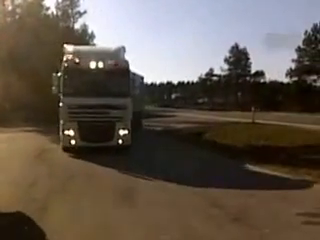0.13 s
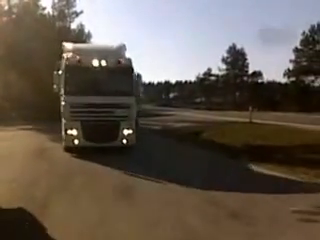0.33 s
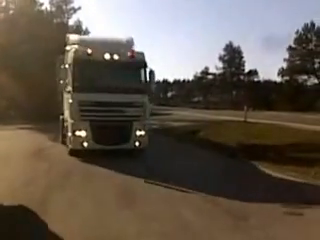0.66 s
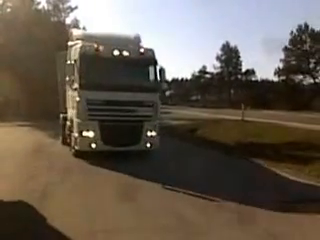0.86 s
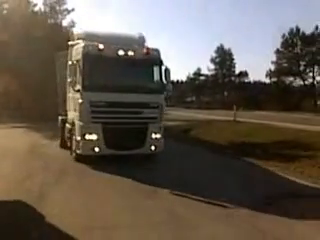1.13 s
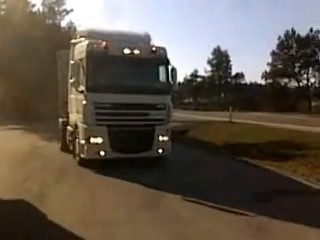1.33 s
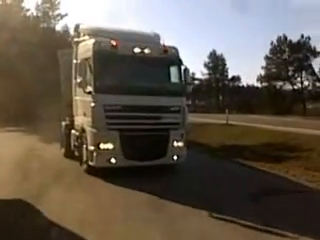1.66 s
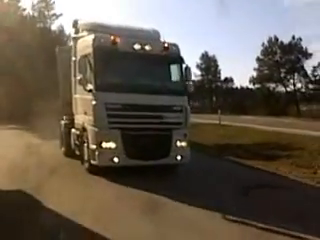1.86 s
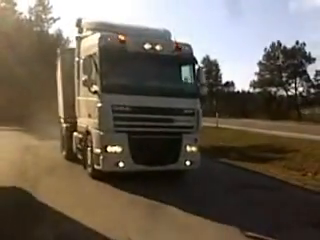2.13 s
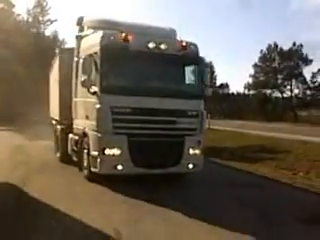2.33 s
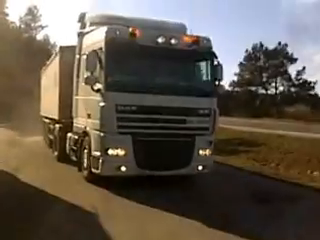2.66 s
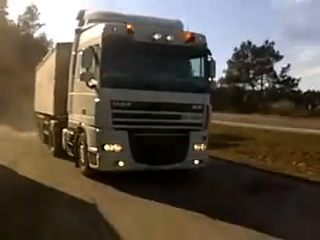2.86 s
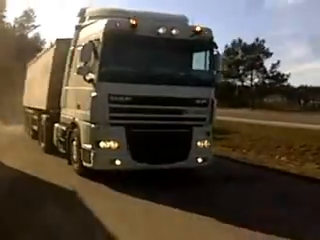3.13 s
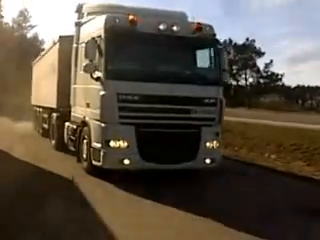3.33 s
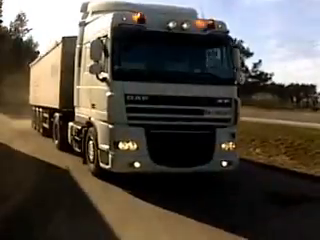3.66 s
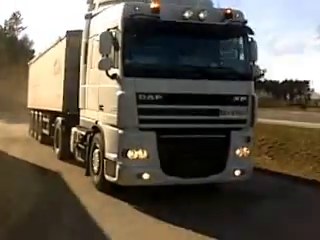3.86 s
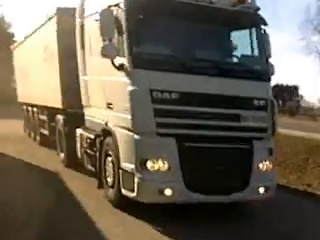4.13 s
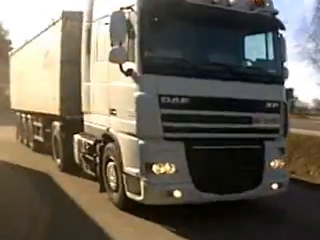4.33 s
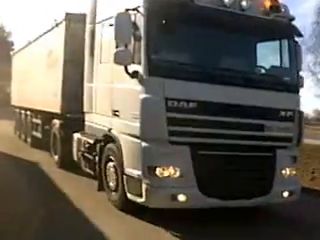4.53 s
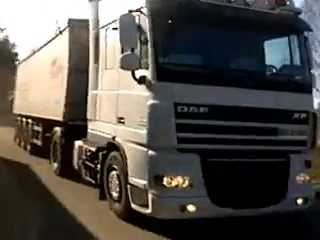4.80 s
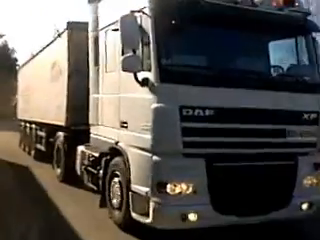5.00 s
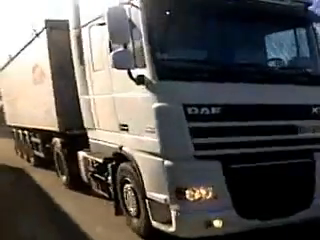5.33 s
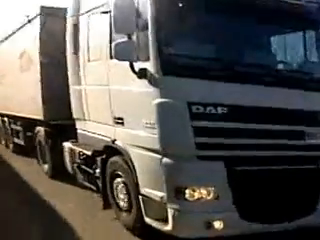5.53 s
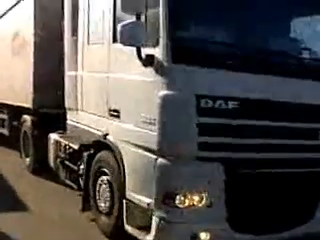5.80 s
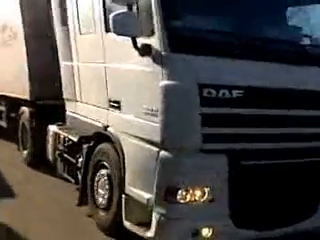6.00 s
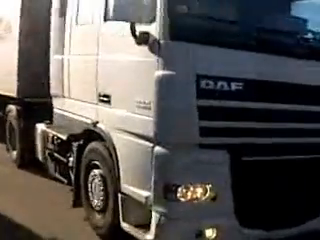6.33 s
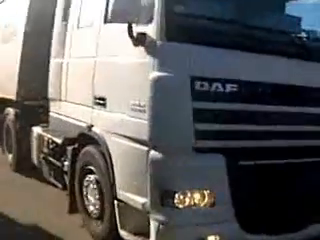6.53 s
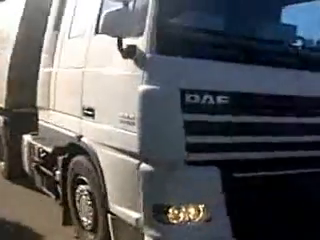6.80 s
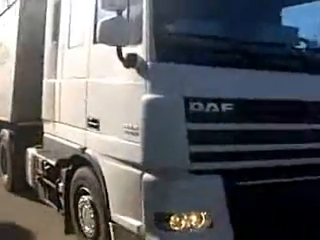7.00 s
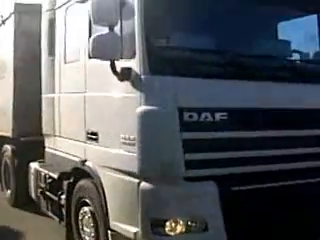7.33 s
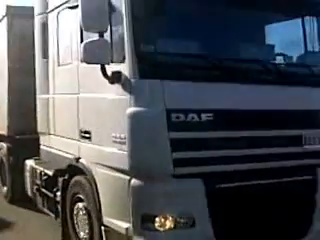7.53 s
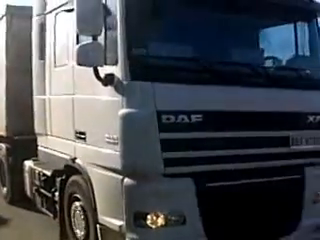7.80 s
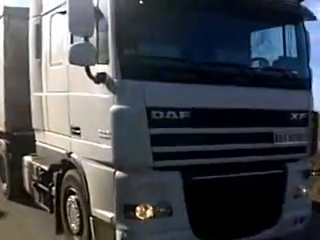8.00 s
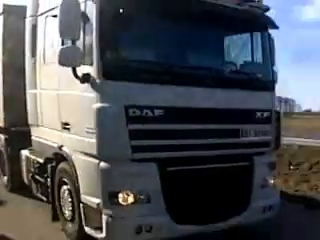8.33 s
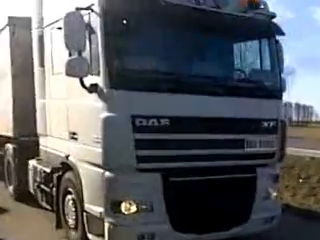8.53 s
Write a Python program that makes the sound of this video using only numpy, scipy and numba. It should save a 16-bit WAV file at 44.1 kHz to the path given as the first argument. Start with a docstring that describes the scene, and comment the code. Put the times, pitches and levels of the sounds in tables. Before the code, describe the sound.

A heavy truck draws near the microphone in blustery wind. Rough low buffeting and sharp pops cover its throbbing engine, with a distant burst of brake air. The horn gives two stabs, then one long, loud, slightly wavering mid-pitched blare that stops abruptly with a short echo. A close, bright air release follows, then small valve puffs, sliding whistles, clearer diesel clatter and a faint gear whine.

```python
"""A truck horn gives two short taps and one long blast: a driven plate makes a stack of tones, coloured by echoes.
Air brakes vent as shaped jets of hiss, and a valve whistles as hiss through narrow, sliding filters.
The diesel is noise throbbing at a steady firing rate, heard lower during the horn, with two gear hums.
Gusts of wind buffet the microphone: low thumps, a higher flutter and sharp pops, all made from noise and pulses."""
import sys
import numpy as np
from scipy import signal
from scipy.fft import rfft, irfft, next_fast_len
from scipy.io import wavfile
from scipy.ndimage import uniform_filter1d
from numba import njit

SR = 44100
rng = np.random.default_rng(int(sys.argv[2]) if len(sys.argv) > 2 else 0)


def transcribe(signal):
    """Save signal, clipped to [-1, 1], as a 16-bit WAV file at the path in sys.argv[1]."""
    frames = np.atleast_2d(signal).T
    limited = np.clip(frames, -1, 1)
    pcm = np.round(limited * 32767).astype(np.int16)
    wavfile.write(sys.argv[1], SR, pcm)


N = 381637  # length in samples


def undb(db):
    """Turn decibels into a gain."""
    return 10 ** (np.asarray(db) / 20)


def unit(x):
    """Scale a sound to an rms level of 1."""
    return x / np.sqrt(np.mean(x ** 2))


def curves(rows):
    """Join the points of a table by straight lines; the first column is time in seconds."""
    s, *columns = np.transpose(rows)
    return [np.interp(np.arange(N) / SR, s, c) for c in columns]


def walk(rate):
    """Wander at random: new levels `rate` times a second, smoothed twice, with a spread near 1."""
    hold = int(SR / rate)
    steps = np.repeat(rng.standard_normal(N // hold + 1), hold)
    smooth = uniform_filter1d(uniform_filter1d(steps, hold), hold)
    return 1.75 * smooth[:N]


def colour(x, points):
    """Filter x by a curve of (pitch_hz, relative_db) points, then scale it to rms 1."""
    size = next_fast_len(N)
    hz, db = np.transpose(points)
    log_hz = np.log(np.arange(size // 2 + 1) * SR / size + 1e-3)
    gain = undb(np.interp(log_hz, np.log(hz), db))
    return unit(irfft(rfft(x, size) * gain, size)[:N])


@njit
def svf(x, hz, width):
    """Let through a band of sound around a centre pitch that can move (state-variable filter)."""
    y, band, low = np.empty(len(x)), 0., 0.
    for i in range(len(x)):
        g, k = np.tan(np.pi * hz[i] / SR), width / hz[i]
        v = (band + g * (x[i] - low)) / (1 + g * (g + k))
        band, low, y[i] = 2 * v - band, low + 2 * g * v, k * v
    return y


# changing breeze under the gusts, with lulls: start_s, thump_db
BREEZE = [(0, -31), (.6, -36), (1.0, -24), (1.59, -42), (2.0, -26), (2.6, -45), (3.0, -30), (3.85, -37.5),
          (4.2, -38.5), (4.6, -31.5), (5.2, -33.5), (5.8, -42.5), (6.3, -30.5), (7.0, -42), (7.5, -36.5),
          (8.3, -32), (8.58, -30), (8.65, -56)]
BREEZE_FLUTTER_DB = -5.5  # flutter against thump
# gusts on the microphone: start_s, length_s, thump_db, flutter_above_thump_db
GUSTS = [(0.12, 0.031, -24, -25), (0.367, 0.068, -32, -9), (0.654, 0.027, -33, -1), (0.766, 0.11, -23.5, 4),
         (.86, 0.11, -19, -7), (1.026, 0.03, -19.5, -1), (1.143, 0.042, -15, 3.5),
         (1.196, 0.049, -14.5, -1.5), (1.37, 0.049, -20.5, -5.5), (1.695, 0.038, -21.5, -9.5),
         (1.824, 0.03, -12.5, -3), (1.991, 0.091, -12.5, -1), (2.137, 0.088, -16, 0),
         (2.346, 0.026, -24.5, -1), (2.709, 0.12, -20, 5), (2.85, 0.17, -24, 4), (3.055, 0.052, -16.5, 0.5),
         (3.272, 0.22, -27.5, 5.5), (3.44, .17, -22.5, -1), (4.374, 0.06, -26, -5.5),
         (5.616, 0.026, -25, 1.5), (5.907, 0.036, -30.5, -7), (5.99, 0.087, -23, -7),
         (6.414, 0.13, -24, -6), (6.627, 0.16, -26, -7.5), (6.848, 0.025, -29, -5.5),
         (7.083, 0.26, -26, -4.5), (7.32, 0.025, -29, -1), (7.593, 0.023, -27, 0), (7.771, 0.014, -25, -4),
         (7.9, 0.063, -23.5, -2), (7.989, 0.067, -21.5, 1.5), (8.13, 0.37, -25, -15),
         (8.508, 0.053, -20, -17.5)]
GUST_RISE_DB_S, GUST_SAG_DB_S = 510, 10
GUST_FALL_DB_S = 231  # on top of the sag


def gusts():
    """Levels of thump and flutter: every gust rises, sags and falls alike, adding its power to the breeze."""
    t = np.arange(N) / SR
    thump_power = undb(2 * curves(BREEZE)[0])
    flutter_power = thump_power * undb(2 * BREEZE_FLUTTER_DB)
    for s, length, db, flutter_db in GUSTS:
        off_db = GUST_RISE_DB_S * np.clip(s - t, 0, 1)
        off_db += GUST_SAG_DB_S * np.clip(t - s, 0, 1)
        off_db += GUST_FALL_DB_S * np.clip(t - s - length, 0, 1)
        thump_power = thump_power + undb(2 * (db - off_db))
        flutter_power = flutter_power + undb(2 * (db + flutter_db - off_db))
    return np.sqrt(thump_power), np.sqrt(flutter_power)


# loudest wind pops: start_s, strength_db
LOUD_POPS = [(0.83, -16), (1.036, -9), (1.084, -14), (1.136, -6), (1.155, -5), (1.17, -4), (1.707, -14.5),
             (2.684, -9), (2.719, -7), (2.75, -16), (2.804, -6), (3.061, -6), (3.098, -8)]
POP_GROWTH, POP_DB = 2.08, 6  # power of the flutter level that small pops follow, and their gain


def wind():
    """Uneven eddies hit the microphone port as thump and flutter; strong gusts also snap sharp pops across it."""
    thump_level, flutter_level = gusts()
    eddies = rng.standard_normal(N) * undb(3.82 * walk(60))
    slow = rng.standard_normal(N) * undb(0.54 * walk(40))
    thump = colour(eddies + slow, [(12, -2), (28, -5.5), (60, 1), (105, -5.5), (170, -26.5), (400, -95)])
    flutter = colour(eddies, [(60, -31.0), (115, 1.0), (200, -2), (320, -10.0), (480, -20.5), (900, -60)])
    # about 90 random kicks a second, of very uneven strength
    kicks = (rng.random(N) < 90 / SR) * rng.choice([-1., 1.], N) * undb(3.5 * rng.standard_normal(N))
    pops = colour(kicks, [(60, -20), (200, -2.5), (450, -1), (750, -11.5), (1200, -19.5), (2500, -48)])
    # pops grow faster than the gust that drives them
    pop_level = undb(POP_DB) * flutter_level ** POP_GROWTH
    # one loud pop: a sharp spike with a slower swing the other way
    lag = np.arange(-200, 600) / SR
    slap = np.exp(-(lag / 0.00049) ** 2) - 0.32 * np.exp(-((lag - .004) / 0.011) ** 2)
    loud = np.zeros(N)
    for s, db in LOUD_POPS:
        loud[int((s + .002) * SR)] = undb(db)
    loud = np.convolve(loud, slap)[200:N + 200]
    rush = thump_level * thump + flutter_level * flutter + pop_level * pops
    # the capsule saturates under the hardest buffets
    return loud + .6 * np.tanh(rush / .6)


FIRING_HZ = 27.83
# diesel as heard, lower while the horn sounds: start_s, clatter_db, throb_depth (0-1)
ENGINE = [(0.0, -32.5, 0.13), (1.08, -29, 0.01), (1.47, -37.5, 0.13), (1.83, -34.5, 0), (2.04, -35, 0.66),
          (2.4, -41, 0.66), (3.0, -38.5, 0.76), (3.5, -41.5, 0.71), (4.6, -42, 0.74), (4.96, -42.5, 0.1),
          (5.64, -35, 0.31), (6.99, -30.5, 0.26), (8.65, -36, 0.41)]
# tone colour of the clatter: pitch_hz, relative_db (per Hz)
CLATTER = [(260, -5), (450, -0.5), (676, -0.5), (782, 0), (944, 2), (1640, 2.5), (2040, -1.5), (2320, -9),
           (3250, -19.5), (4280, -19), (5240, -16.5), (7760, -26.5), (10200, -26), (14500, -46)]
# engine block rings at each knock: pitch_hz, width_hz, level_db (against the clatter, at full throb)
BLOCK = [(3090, 320, -15), (5060, 1200, -15.5)]
# gear tones: start_s, end_s, start_pitch_hz, end_pitch_hz, level_db
GEAR_HUM = [(6.298, 8.59, 344.4, 368.5, -49), (6.758, 7.59, 2043, 1975, -39.5)]


def engine():
    """Combustion knock swells the clatter once a firing and rings the block; gears add sliding tones."""
    db, depth = curves(ENGINE)
    t = np.arange(N) / SR
    firings = FIRING_HZ * t
    since = firings % 1  # part of a firing gone by
    sizes = undb(2.2 * rng.standard_normal(int(firings[-1]) + 2))
    size = sizes[firings.astype(int)]
    depth = np.clip(depth, 0, 1)
    knock = 1 - depth + depth * 5.3 * size * np.exp(-since / 1.26)
    knock = uniform_filter1d(knock, size=260)  # pressure rises over a few ms
    clatter = colour(knock * rng.standard_normal(N), CLATTER)
    burst = size * np.sin(np.pi * since ** .5) ** 4 * rng.standard_normal(N)
    for ring_hz, width_hz, ring_db in BLOCK:
        centre, width = np.full(N, 1. * ring_hz), 1. * width_hz
        ring = unit(svf(svf(burst, centre, width), centre, width))
        clatter += depth * undb(ring_db) * ring
    hum = 0
    for on, off, from_hz, to_hz, tone_db in GEAR_HUM:
        fade = np.clip(np.minimum(t - on, off - t) / 0.43, 0, 1)
        phase = 2 * np.pi * np.cumsum(np.interp(t, [on, off], [from_hz, to_hz])) / SR
        hum = hum + fade * undb(tone_db + 2 * walk(10)) * np.sin(phase)
    return undb(db + 0.46 * walk(8.7)) * clatter + hum


def jet(t, s, db, rise, hold, t60):
    """Power of an air jet that opens, holds and dies away; t60 is the time to fall 60 dB."""
    opening = np.clip((t - s) / rise, 0, 1) ** 2
    dying = np.exp(-2 * np.log(1000) * np.clip(t - s - rise - hold, 0, None) / t60)
    return undb(2 * db) * opening * dying


# air brakes dumping pressure: start_s, level_db (of the long jet), hold_s, t60_s
RELEASES = [(0.961, -34.5, 0.075, 1.37), (5.593, -33, 0.17, 1.74)]
# each release also spits: a short jet, louder than the long one by SPIT_DB
RELEASE_RISE_S, SPIT_DB, SPIT_T60_S = .0025, 2, .25
# small puffs from the valves: start_s, peak_db, hold_s
PUFFS = [(0.845, -48.5, .03), (5.084, -53.5, 0.015), (5.462, -49, .03), (6.12, -47, 0.086),
         (6.471, -43, 0.057), (6.61, -46.5, 0.12), (7.012, -41.5, 0.052), (7.438, -53, 0.044)]
PUFF_RISE_S, PUFF_T60_S = 0.018, 0.3
# tone colour of the hiss close by: pitch_hz, relative_db (per Hz)
VENT_AIR = [(1290, -33), (2200, -9), (2820, -3), (3410, -12), (4550, -2), (7940, -9), (10200, -2),
            (12000, -14), (13600, -6.5), (14800, -43)]
# tone colour of the same jets from further off: pitch_hz, relative_db (per Hz)
FAR_VENT_AIR = [(1470, -41), (2500, -18), (3160, -11), (3380, -25), (4370, -2), (4920, -5), (6800, -11),
                (9120, -1.5), (13600, -17), (14500, -28)]
NEAR_FROM_S = 3.5  # the close colour takes over here
# breathy whistles of a brake valve: start_s, length_s, start_pitch_hz, end_pitch_hz, width_hz, level_db (before fades)
WHISTLES = [(5.767, .22, 1650, 1450, 141, -28.5), (6.101, 0.18, 1640, 1490, 177, -27.5),
            (6.62, 0.16, 1830, 1440, 177, -28), (6.778, 0.054, 1620, 1610, 200, -31),
            (7.012, 0.11, 1640, 1580, 176, -26)]


def brakes():
    """Jets of air open fast and die as the pressure drops; a valve mouth whistles as narrow, sliding noise."""
    t = np.arange(N) / SR
    power = np.zeros(N)
    for s, db, hold, t60 in RELEASES:
        power += jet(t, s, db, RELEASE_RISE_S, hold, t60)
        power += jet(t, s, db + SPIT_DB, RELEASE_RISE_S, 0, SPIT_T60_S)
    for s, db, hold in PUFFS:
        power += jet(t, s, db, PUFF_RISE_S, hold, PUFF_T60_S)
    air = rng.standard_normal(N)
    hiss = np.where(t < NEAR_FROM_S, colour(air, FAR_VENT_AIR), colour(air, VENT_AIR))
    out = np.sqrt(power) * undb(.6 * walk(25)) * hiss
    breath = rng.standard_normal(N) * undb(1.5 * walk(60))
    for s, length, from_hz, to_hz, width_hz, db in WHISTLES:
        span = slice(int(s * SR), int((s + length) * SR))
        centre = np.linspace(from_hz, to_hz, span.stop - span.start)
        # filtered twice, the second time twice as wide
        tone = svf(svf(breath[span], centre, 1. * width_hz), centre, 2. * width_hz)
        out[span] += undb(db) * unit(tone) * np.hanning(len(tone)) ** 0.23
    return out


# mirror paths off ground, cab and nearby vehicles, their detours changing as the truck rolls:
# strength_db (before the loss per partial), detour_m (at ECHO_AT_S), change_m_per_s, curvature_m_per_s2
ECHOES = [(-4.4, .746, -.104, -.011), (-12.2, 1.273, -1.311, .4), (-8.3, .796, -.538, .02),
          (-9.9, .532, .083, -.019), (-13.8, .265, -.073, .291), (-11.5, 1.19, -.932, .192)]
ECHO_AT_S, WAVELENGTH_M = 3.5, 343 / 387  # speed of sound in m/s over horn pitch in Hz
ECHO_LOSS_DB = 1.0  # each echo is weaker by this much per partial


def mirrored(k, t):
    """Gain and phase of partial k once its echoes have joined the direct sound."""
    u = t - ECHO_AT_S
    total = 1
    for db, detour, speed, bend in ECHOES:
        path_m = detour + u * (speed + u * bend)
        total = total + undb(db - ECHO_LOSS_DB * k) * np.exp(-2j * np.pi * k * path_m / WAVELENGTH_M)
    return total


def scattered(phase, share, span):
    """A partial plus its drifting scattered copy: the two beat into irregular fades."""
    drift = share * (walk(30)[span] + 1j * walk(30)[span]) / np.sqrt(2)
    return np.imag((1 + drift) * np.exp(1j * phase)) / np.sqrt(1 + share ** 2)


def yard(x):
    """Add scattered echoes off the yard: a dying, dulled burst of noise smears the sound."""
    t60_s, level_db = .35, -21
    lag = np.arange(int(.6 * SR)) / SR
    echo = rng.standard_normal(len(lag)) * np.exp(-np.log(1000) * lag / t60_s)
    echo = signal.lfilter([.15], [1, -.85], echo)
    return x + undb(level_db) * signal.fftconvolve(x, echo / np.linalg.norm(echo))[:N]


# horn button: pressed_s, released_s, ring_down_db (added to each free ring)
BLASTS = [(1.831, 1.912, 1), (1.989, 2.122, 0.5), (2.175, 4.8, -5.5)]
# settled pitch of the horn: start_s, pitch_hz
HORN_PITCH = [(1.8, 391), (1.9, 390.4), (2.1, 389.3), (2.3, 387.9), (3.0, 387.3), (3.75, 386.7),
              (4.15, 387), (4.4, 387.6), (4.8, 387.2)]
# horn as the truck draws near and turns: start_s, low_partials_db, fundamental_db (added to those), brassy_top_db
HORN = [(1.85, -22, 3.5, -35), (1.89, -19.5, -20, -32), (2.05, -18.5, 0, -31.5), (2.2, -19, -1, -29),
        (2.5, -21.5, -1, -34.5), (2.87, -20, -7, -33), (3.1, -22, 0.5, -33), (3.5, -24.5, 2, -33),
        (3.85, -18.5, -3.5, -31.5), (4.25, -19, 1, -33.5), (4.63, -17.5, -1, -31), (4.8, -19, -7, -33.5)]
# partials 1-7 at the bell: level_db (before the HORN levels)
LOW_PARTIALS_DB = [3, -9, 2, -11.5, -6.5, -11, -16.5]
# brassy top: partial_number, relative_db
UPPER = [(8, -24), (9, -29), (10, -27), (11, -22), (12, -23), (13, -18), (14, -26), (15, -28), (16, -30),
         (17, -28), (18, -31), (19, -33), (20, -29), (21, -29), (22, -30), (23, -33), (24, -32), (25, -31),
         (26, -30), (27, -36), (28, -37), (29, -40), (30, -40), (31, -40), (32, -44), (33, -46), (34, -46),
         (35, -45), (36, -44)]
# one upper partial fades, then stands out: start_s, extra_db
RINGING = [(1.9, -6), (2.6, 0.5), (3.2, -7), (3.75, 0), (4.15, 3), (4.55, 7), (4.8, 0)]
RINGING_PARTIAL = 13
# weak buzz on the horn tone: start_s, rate_hz
FLUTTER = [(2.2, 135), (3.3, 118), (4.0, 92), (4.8, 95)]
FLUTTER_RAD = .11  # phase swing of the buzz on partials above the second
# free ring of the diaphragm: pitch_hz, level_db (before ring_down_db), t60_s
DIAPHRAGM = [(412, -1.5, 0.2), (812, -6, 0.064), (1243, -12, 0.07), (1660, -9, 0.05)]
# tone colour of the rasp as the diaphragm catches and lets go: pitch_hz, relative_db (per Hz)
RASP = [(1500, 4), (3000, 1), (4800, 10.5), (6200, -3), (9000, -1), (13000, -92)]
RASP_DB, RASP_OFF_DB, RASP_S = -36.5, -39, 0.01
SCATTER_PER_PARTIAL, SCATTER_MOST = .14, .5  # share of drifting scattered sound in the low partials


def horn():
    """A driven diaphragm: a clean stack of partials that starts sharp and rings free when released."""
    t = np.arange(N) / SR
    hz, = curves(HORN_PITCH)
    low_db, first_db, rest_db = curves(HORN)
    gate, bright, out = np.zeros(N), np.zeros(N), np.zeros(N)
    rasp = colour(rng.standard_normal(N), RASP)
    for on, off, ring_db in BLASTS:
        catch = undb(RASP_DB) * np.exp(-((t - on - RASP_S) / RASP_S) ** 2)
        let_go = undb(RASP_OFF_DB) * np.exp(-((t - off - RASP_S) / (2 * RASP_S)) ** 2)
        out += rasp * (catch + let_go)
        since, after = np.clip(t - on, 0, None), np.clip(t - off, 0, None)
        gate += (1 - np.exp(-since / 0.002)) * np.exp(-after / 0.011)
        # the brassy top builds up later than the body of the tone
        bright += (1 - np.exp(-(since / 0.01) ** 2)) * np.exp(-after / 0.0072)
        # sharp at the start, and pulled up towards the free pitch around the release
        bend = (t > off - .01) * (t < off + .045) * np.clip((t - off + .01) / .03, 0, 1)
        hz = hz * (1 + .022 * (t > on) * np.exp(-since / .015) + .01 * bend)
        late = np.clip(t - off + .008, 0, None)
        for mode_hz, db, t60 in DIAPHRAGM:
            shape = (1 - np.exp(-late / 0.015)) * np.exp(-np.log(1000) * late / t60)
            out += undb(ring_db + db) * shape * np.sin(2 * np.pi * mode_hz * late)

    span = slice(int(BLASTS[0][0] * SR), int((BLASTS[-1][1] + 0.064) * SR))
    buzz = FLUTTER_RAD * np.sin(2 * np.pi * np.cumsum(curves(FLUTTER)[0][span]) / SR)
    phase = 2 * np.pi * np.cumsum(hz[span]) / SR
    start = 2 * np.pi * rng.random(len(LOW_PARTIALS_DB) + len(UPPER))
    body = 0
    for k, db in enumerate(LOW_PARTIALS_DB, 1):
        paths = mirrored(k, t[span])
        heard = k * phase + start[k - 1] + np.angle(paths) + (k > 2) * buzz
        level = undb(db + low_db[span] + (k == 1) * first_db[span]) * np.abs(paths)
        body = body + level * scattered(heard, min(SCATTER_PER_PARTIAL * k, SCATTER_MOST), span)
    # each weaker partial fades and flickers on its own
    ringing_db = curves(RINGING)[0][span]
    top = 0
    for k, db in UPPER:
        level = undb(db + (k == RINGING_PARTIAL) * ringing_db + 1.5 * walk(6)[span])
        top = top + level * scattered(k * phase + start[int(k) - 1] + buzz, .4, span)
    out[span] += gate[span] * body + bright[span] * undb(rest_db[span]) * unit(top)
    return yard(out)


def scene():
    """Add all sources together at one microphone."""
    return (wind() + engine() + brakes() + horn())[None]


# hollow in the microphone response: pitch_hz, width_hz, depth (0-1)
MIC_DIP = (5870, 1200, 0.22)
TOP_HZ = 14400


def record(dry):
    """The microphone has a hollow in the treble; then the loudest peaks are rounded and the top is cut."""
    dip_hz, width_hz, depth = MIC_DIP
    heard = dry - depth * svf(dry[0], np.full(N, 1. * dip_hz), 1. * width_hz)
    rounded = np.tanh(.3 * heard) / .3
    top_cut = signal.ellip(10, .2, 90, TOP_HZ, fs=SR, output="sos")
    return signal.sosfilt(top_cut, rounded)


dry = scene()
out = record(dry)
transcribe(out)
```